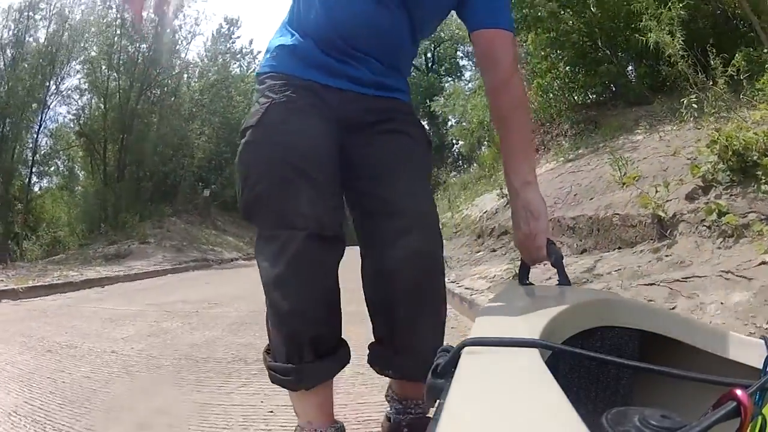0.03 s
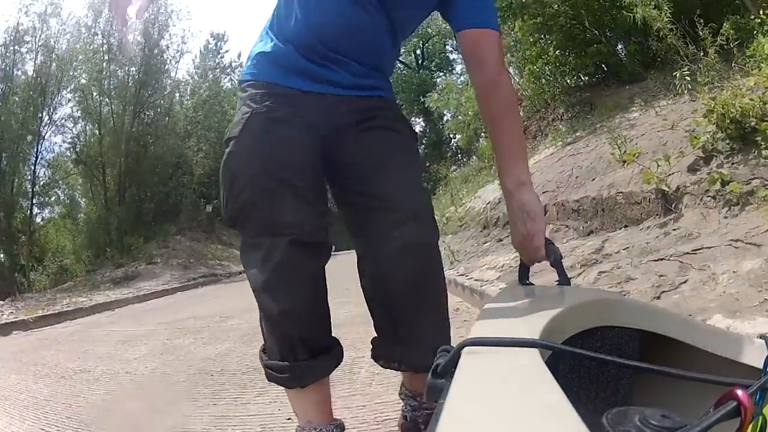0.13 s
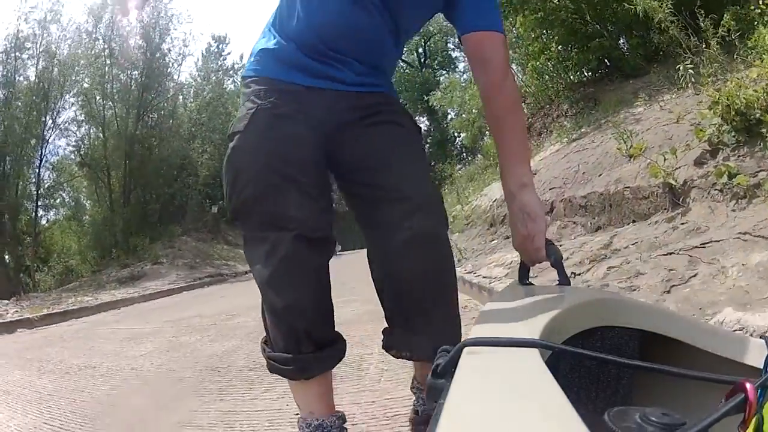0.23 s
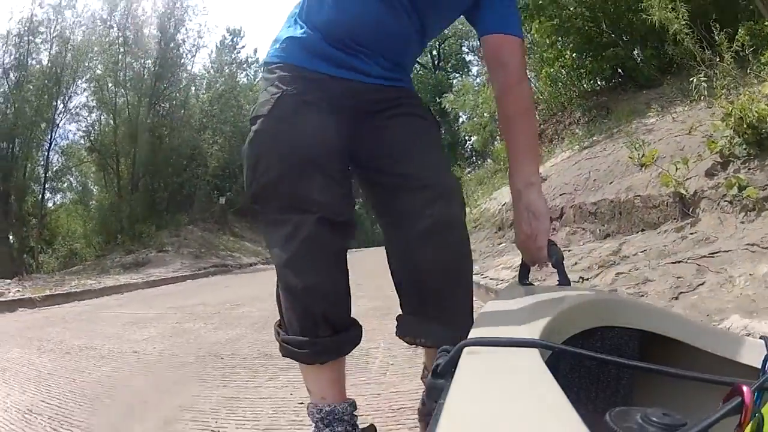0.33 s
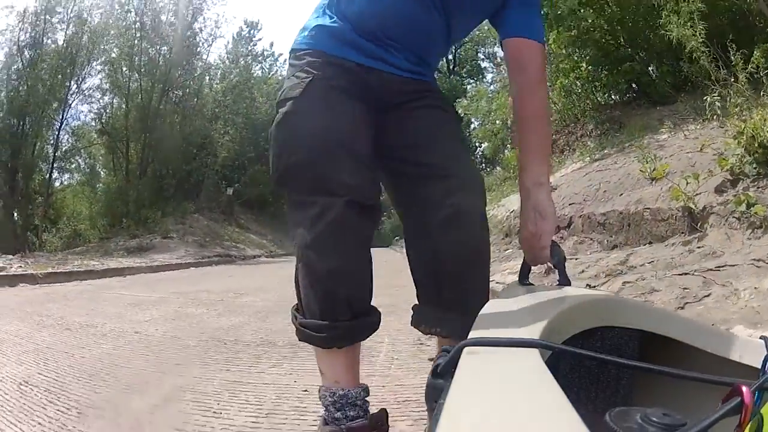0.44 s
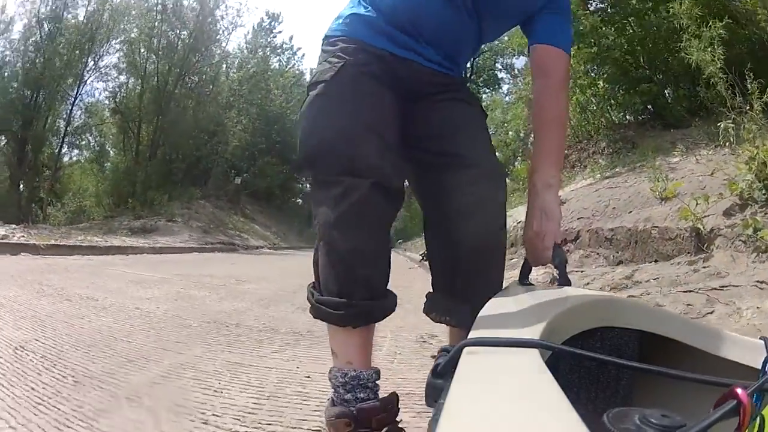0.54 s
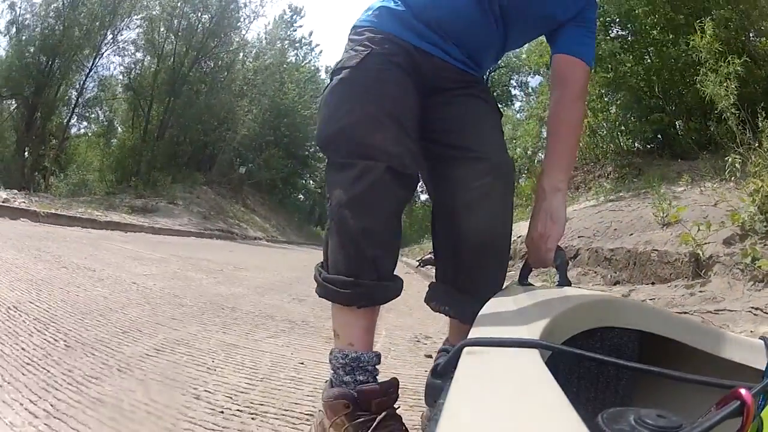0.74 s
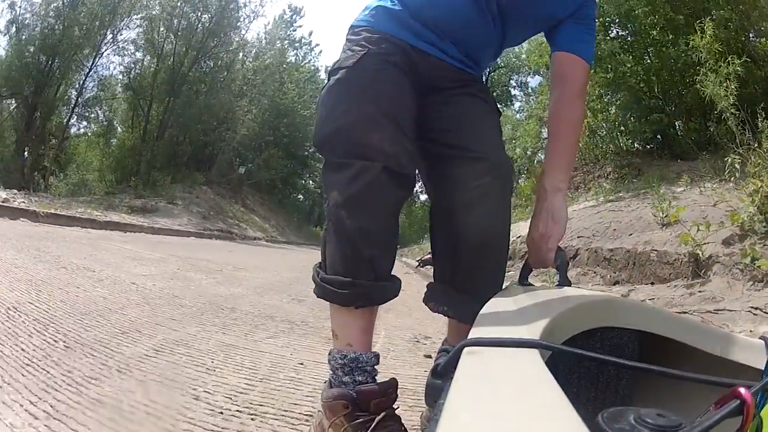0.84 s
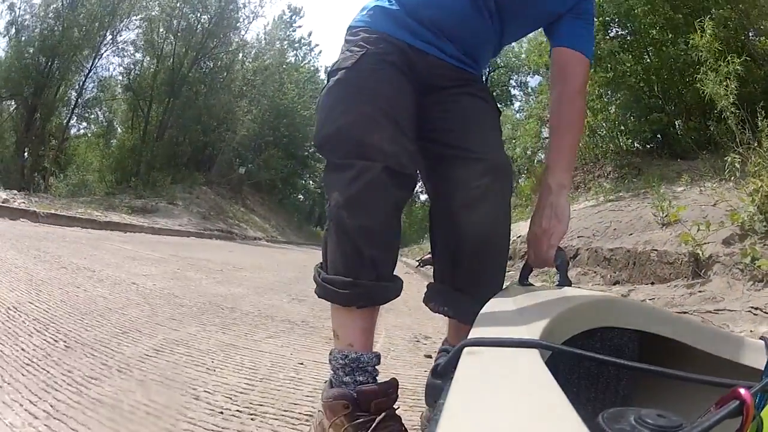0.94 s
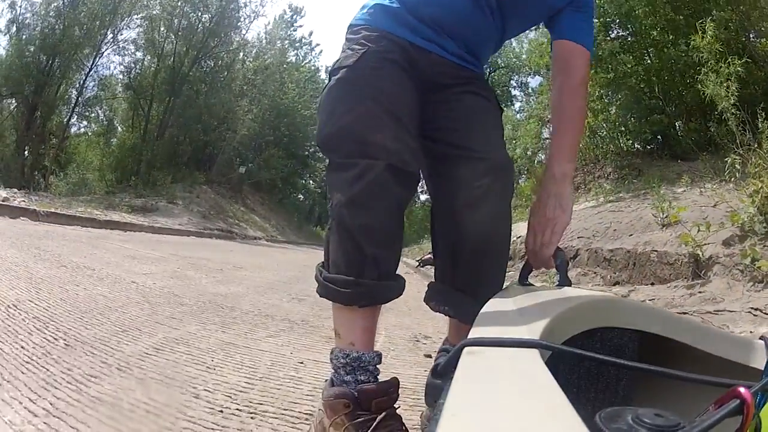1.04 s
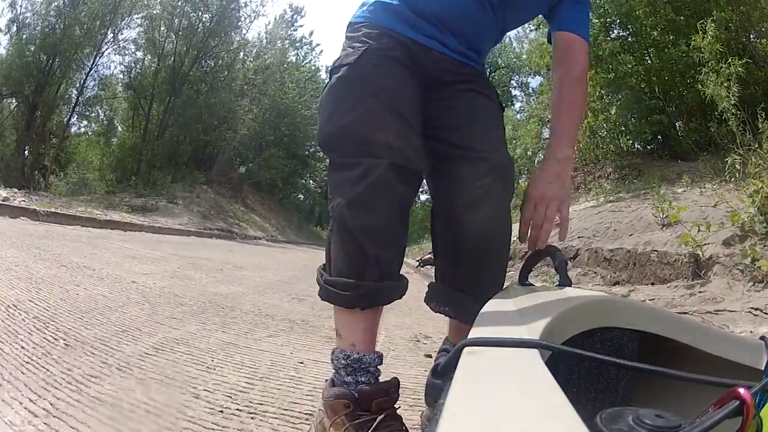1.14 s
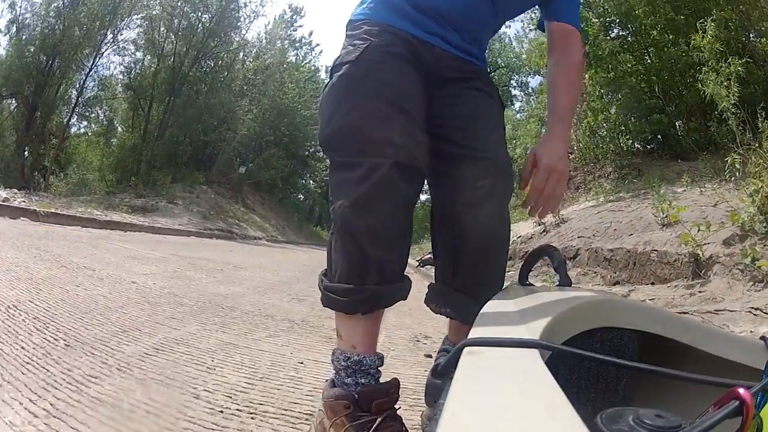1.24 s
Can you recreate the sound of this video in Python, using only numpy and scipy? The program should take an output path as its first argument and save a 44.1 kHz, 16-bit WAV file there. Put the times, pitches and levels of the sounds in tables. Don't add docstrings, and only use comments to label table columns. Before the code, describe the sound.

Hollow plastic boat dragged on gritty concrete, with hard clattering knocks, scraping and deep booming flex

```python
import sys
import numpy as np
from scipy import signal
from scipy.fft import rfft, irfft
from scipy.io import wavfile

SR = 44100
rng = np.random.default_rng(int(sys.argv[2]) if len(sys.argv) > 2 else 0)


def magnitude_from_level(level_db):
    exponent = np.asarray(level_db, float) / 20
    return 10 ** exponent


def store_wav(level_fs):
    pcm = np.round(np.clip(np.atleast_2d(level_fs), -1, 1) * 32767)
    wavfile.write(sys.argv[1], SR, pcm.T.astype(np.int16))


N = 57330

# [start_s, peak_db, chatter_s, favoured_hz, thump_db]
KEEL_KNOCKS = [(.192, -45, 0.0052, 2000, -12), (.2425, -14.5, 0.0062, 2400, -45),
               (.2475, -15.5, 0.007, 3170, -13.5), (.248, -2.5, 0.0034, 820, -8.5),
               (.2495, -10.5, 0.0048, 467, -5), (.26, -5.5, 0.0092, 760, -8.5),
               (.261, -25.5, 0.0035, 3340, 2), (.29, -18.5, 0.0092, 880, -1), (.386, -27, 0.0033, 790, 5),
               (.418, -24, 0.0087, 900, -30), (0.634, -18, 0.003, 970, -25), (.685, -22, 0.004, 800, -9),
               (.77, -23.5, 0.0033, 875, -11), (.783, -31, 0.0042, 900, -17),
               (.846, -16.5, 0.0071, 880, -11.5), (.848, -31.5, 0.0054, 1670, 11),
               (.907, -22.5, 0.0021, 1020, 0.5), (.941, -37.5, 0.0032, 3300, -13),
               (.976, -17, .003, 656, -8), (.977, -23.5, 0.002, 1980, -31),
               (1.019, -30.5, 0.0029, 685, -10), (1.084, -30, 0.0058, 955, -29),
               (1.124, -39, 0.0031, 699, -11), (1.221, -38.5, 0.0099, 850, -32)]
# [start_s, peak_db, chatter_s, favoured_hz, thump_db]
BOW_LANDING = [
    (.7095, -6, 0.0053, 710, -5),
    (.7225, -21.5, 0.003, 2780, 13),
    (.735, -27, 0.0074, 1200, 14),
    (.728, -42, 0.016, 4500, -13),
]
PANEL_HZ = [450, 530, 665, 790, 978, 1038, 1244, 1730, 1880, 2150, 2600, 3010, 3565, 4700]
# [level_db, t60_s]
PANEL_RING = [(-6, 0.037), (-8, 0.026), (-0.5, 0.068), (-7, 0.035), (-7.5, 0.066), (-15, 0.042),
              (-15, 0.064), (-15, 0.038), (-15, 0.029), (-20.5, 0.022), (-26.5, 0.014), (-23.5, 0.019),
              (-23.5, 0.029), (-26, 0.0074)]
# [pitch_hz, level_db, t60_s]
SHELL_MODES = [(105.8, -7.5, 0.079), (154, -19, 0.059), (201, -8.5, 0.11), (267.7, -8, 0.049),
               (356, -10, 0.062)]
# [time_s, level_db, brightness_db]
GRIT_DRAG = [(0, -66.5, 11), (.24, -55, -44), (.262, -37.5, -0.5), (.33, -36.5, -9), (.4, -28.5, -12),
             (.46, -32.5, -10), (.54, -39, -11.5), (.63, -37.5, -8), (.65, -31.5, -9.5), (.7, -40, -1.5),
             (.75, -29.5, -13.5), (.8, -36, -15.5), (.855, -32.5, -11), (.875, -36, -28), (.94, -37, -30),
             (1.0, -47.5, -6), (1.15, -47, -9), (1.3, -63, -9)]
# [time_s, level_db, pitch_hz]
HULL_FLEX = [(0.0, -51, 53.33), (0.216, -62, 56.37), (0.256, -30.5, 57.7), (0.296, -20.5, 54.4),
             (0.44, -28.5, 62.1), (0.458, -30, 60.8), (0.502, -38, 49.4), (0.532, -52, 49.6),
             (0.556, -34.5, 50.12), (0.698, -40, 59.76), (0.748, -17, 52.1), (0.782, -17.5, 48.75),
             (0.894, -26, 53.22), (0.94, -12.5, 58.3), (0.962, -19.5, 57.54), (1.1, -33.5, 53.6),
             (1.162, -35, 52.7), (1.3, -46.5, 49.9)]
# [start_s, peak_db, pitch_hz]
FITTING_TICKS = [(.303, -51, 4800), (0.3074, -35, 5350), (0.3122, -30, 4930), (0.3478, -27, 5340),
                 (.356, -33.5, 4830), (0.3637, -33, 4800), (.371, -36, 4900), (0.601, -37.5, 5000),
                 (0.668, -62, 4660), (0.78, -48, 5270), (.892, -43, 4280), (.893, -43, 3280),
                 (0.954, -43, 4800), (0.962, -41.5, 4770), (.972, -41, 5200), (.99, -43.5, 5300),
                 (1.04, -60, 4850), (1.179, -50.5, 4600)]
# [start_s, length_s, level_db, pitch_hz]
HULL_CREAKS = [
    (0, 0.035, -49, 875),
    (0.014, 0.028, -55.5, 1050),
    (.045, 0.012, -71, 2600),
    (0.113, 0.024, -55, 2150),
    (0.164, 0.011, -57, 720),
    (0.155, .04, -64, 2100),
    (.08, .02, -65, 2100),
    (.198, .03, -57, 900),
    (1.091, 0.043, -52, 1900),
]
# [pitch_hz, density_db_per_hz]
AIR_SPECTRUM = [(53, -65), (90, -9.5), (944, -21), (1480, -20), (2130, -19), (2710, -28), (3700, -21.5),
                (5600, -30.5), (7280, -77), (12300, -120)]

FREE, LOADED = 1, 1.055
KNOCK_FOCUS_DB, LANDING_FOCUS_DB = 8.5, 19


def knocks(table, stiffen, focus_db):
    out = np.zeros(N + SR)
    t = np.arange(SR // 5) / SR
    panels = panel_modes(stiffen)
    for start_s, peak_db, chatter_s, favoured_hz, thump_db in table:
        swell = t / chatter_s * np.exp(-(t / chatter_s) ** 2)
        clack = struck(panels, swell, favoured_hz, focus_db)
        thump = struck(SHELL_MODES, swell, favoured_hz, 0)
        i = int(start_s * SR)
        out[i:i + len(t)] += magnitude_from_level(peak_db) * (clack + magnitude_from_level(thump_db) * thump)
    return out[:N]


def struck(modes, swell, favoured_hz, focus_db):
    chance_colour_db = 3
    out = 0
    for hz, level_db, t60_s in modes:
        near = signal.butter(2, [hz / 1.5, hz * 1.25], "band", fs=SR, output="sos")
        burst = signal.sosfilt(near, swell * rng.standard_normal(len(swell)))
        part = ring(burst, hz, t60_s)
        octaves = np.log2(hz / favoured_hz)
        colour_db = level_db - focus_db * octaves ** 2 + chance_colour_db * rng.standard_normal()
        out = out + magnitude_from_level(colour_db) * part / np.abs(part).max()
    return out / np.abs(out).max()


def panel_modes(stiffen):
    return [(hz * stiffen, level_db, t60_s) for hz, (level_db, t60_s) in zip(PANEL_HZ, PANEL_RING)]


def grit():
    grains_per_s, spread_db, damping = 2500, 3.0, 0.36
    level_db, bright_db = in_time(GRIT_DRAG)
    clump = magnitude_from_level(1.5 * drift(18))
    low, high = np.zeros(N), np.zeros(N)
    for hz, mode_db, t60_s in SHELL_MODES + panel_modes(FREE):
        grains = clump * clicks(grains_per_s, spread_db, N)
        part = magnitude_from_level(mode_db) * ring(grains, hz, t60_s * damping)
        if hz < 1400:
            low = low + part
        else:
            high = high + part
    return magnitude_from_level(level_db) * (rms_one(low) + magnitude_from_level(bright_db) * rms_one(high))


def flex():
    octave_db, rumble_db, sway_db, rough_db = -21.5, -4, -9, 0
    level_db, hz = in_time(HULL_FLEX)
    phase = 2 * np.pi * np.cumsum(hz) / SR
    tone = np.sqrt(2) * (np.sin(phase) + magnitude_from_level(octave_db) * np.cos(2 * phase))
    tone = tone * magnitude_from_level(rough_db * drift(33))
    rumble = deep_noise(44.6, 0.067)
    sway = deep_noise(74, 0.053)
    return magnitude_from_level(level_db) * (tone + magnitude_from_level(rumble_db) * rumble + magnitude_from_level(sway_db) * sway)


def groan():
    groan_db, damping = -15, 0.29
    level_db = in_time(HULL_FLEX)[0]
    mumble = np.zeros(N)
    for hz, mode_db, t60_s in SHELL_MODES:
        wander = magnitude_from_level(mode_db + 2.0 * drift(11))
        mumble += wander * rms_one(ring(rng.standard_normal(N), hz, t60_s * damping))
    muffled = signal.sosfilt(signal.butter(2, 450, fs=SR, output="sos"), mumble)
    return magnitude_from_level(level_db + groan_db) * rms_one(muffled)


def ticks():
    width_hz, t60_s = 1190, 0.013
    out = np.zeros(N + SR)
    t = np.arange(SR // 20) / SR
    for start_s, peak_db, hz in FITTING_TICKS:
        puff = rng.standard_normal(len(t)) * magnitude_from_level(-60 * t / t60_s)
        edges_hz = [hz - width_hz / 2, hz + width_hz / 2]
        puff = signal.sosfilt(signal.butter(2, edges_hz, "band", fs=SR, output="sos"), puff)
        i = int(start_s * SR)
        out[i:i + len(t)] += magnitude_from_level(peak_db) * puff / np.abs(puff).max()
    return out[:N]


def creaks():
    slips_per_s, t60_s = 530, 2.2 / 90
    out, t = np.zeros(N), np.arange(N) / SR
    for start_s, length_s, level_db, hz in HULL_CREAKS:
        half_s = length_s / 2
        swell = np.exp(-((t - start_s - half_s) / half_s) ** 4)
        slips = clicks(slips_per_s, 1.0, N)
        out += magnitude_from_level(level_db) * swell * rms_one(ring(slips, hz, t60_s))
    return out


def water():
    return magnitude_from_level(-51 + 2.6 * drift(6)) * deep_noise(36, 0.078)


def air():
    hz = np.fft.rfftfreq(N, 1 / SR) + 1
    point_hz, point_db = np.array(AIR_SPECTRUM).T
    shape = magnitude_from_level(np.interp(np.log(hz), np.log(point_hz), point_db))
    swell = magnitude_from_level(-62 + 1.5 * drift(14))
    return swell * rms_one(irfft(rfft(rng.standard_normal(N)) * shape, N))


def ring(drive, hz, t60_s):
    r, w = magnitude_from_level(-60 / (t60_s * SR)), 2 * np.pi * hz / SR
    return signal.lfilter([0, np.sin(w)], [1, -2 * r * np.cos(w), r * r], drive + 1e-18)


def deep_noise(hz, t60_s):
    once = ring(rng.standard_normal(N), hz, t60_s)
    return rms_one(ring(once, hz, t60_s))


def clicks(per_s, spread_db, size):
    draw = rng.random((size, 3))
    happens = draw[:, 0] < per_s / SR
    height = magnitude_from_level(-spread_db * np.log(draw[:, 1] + 0.0073))
    return happens * height * np.sign(draw[:, 2] - 0.5)


def drift(rate_hz):
    r = np.exp(-2 * np.pi * rate_hz / SR)
    wander = signal.lfilter([1], [1, -2 * r, r * r], rng.standard_normal(N + SR))
    return rms_one(wander[SR:])


def in_time(rows):
    time_s, *columns = np.transpose(rows)
    return [np.interp(np.arange(N) / SR, time_s, column) for column in columns]


def rms_one(x):
    return x / np.sqrt(np.mean(x ** 2) + 1e-20)


def scene():
    hull = flex() + groan() + grit()
    impacts = knocks(KEEL_KNOCKS, FREE, KNOCK_FOCUS_DB) + knocks(BOW_LANDING, LOADED, LANDING_FOCUS_DB)
    details = ticks() + creaks()
    return (hull + impacts + details + water() + air())[None]


def roll_off(x):
    return signal.sosfilt(signal.butter(12, 15780, fs=SR, output="sos"), x)


def record(dry):
    hold_hz, cutoff_hz = 12000, 15750
    overloaded = 1.279 * np.tanh(dry / 1.318)
    low = signal.sosfilt(signal.butter(8, 5650, fs=SR, output="sos"), overloaded)
    low = signal.sosfilt(signal.butter(2, 48.6, "high", fs=SR, output="sos"), low)
    mirrored = low * (1 + 2 * np.cos(2 * np.pi * hold_hz * np.arange(N) / SR))
    hz = np.fft.rfftfreq(N, 1 / SR)
    hold = np.sinc(hz / hold_hz) / np.sinc(hz / hold_hz / 4)
    held = irfft(rfft(mirrored) * hold * (hz < cutoff_hz), N)
    held = signal.sosfilt(signal.butter(12, 15200, fs=SR, output="sos"), held)
    return roll_off(held)


dry = scene()
out = record(dry)
store_wav(out)
```